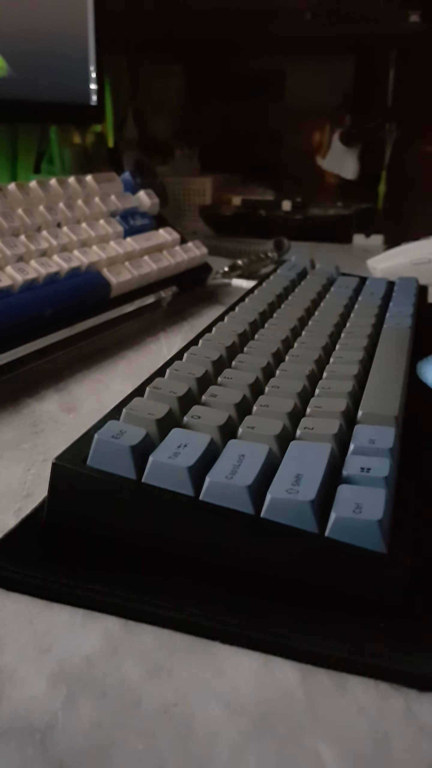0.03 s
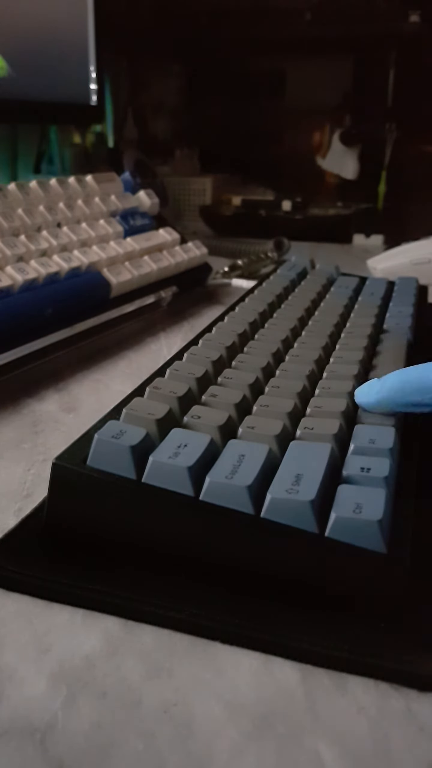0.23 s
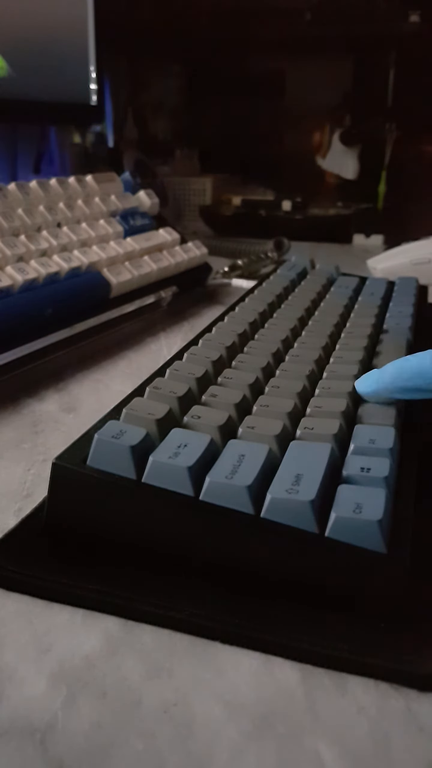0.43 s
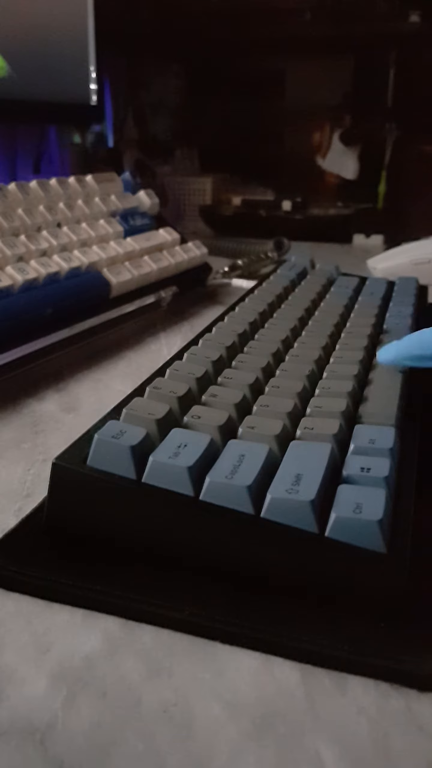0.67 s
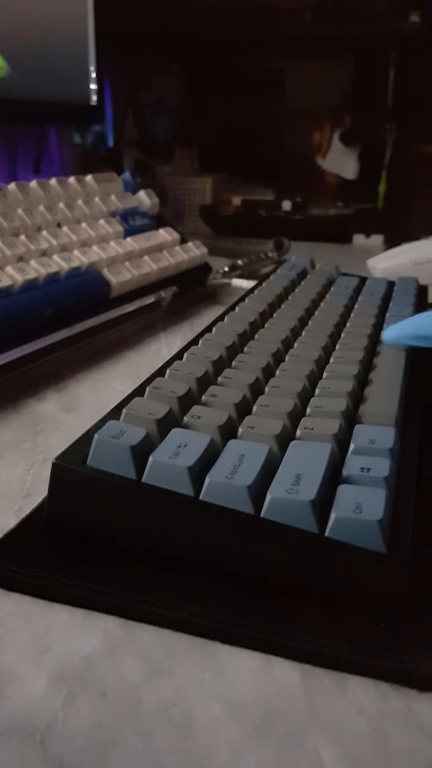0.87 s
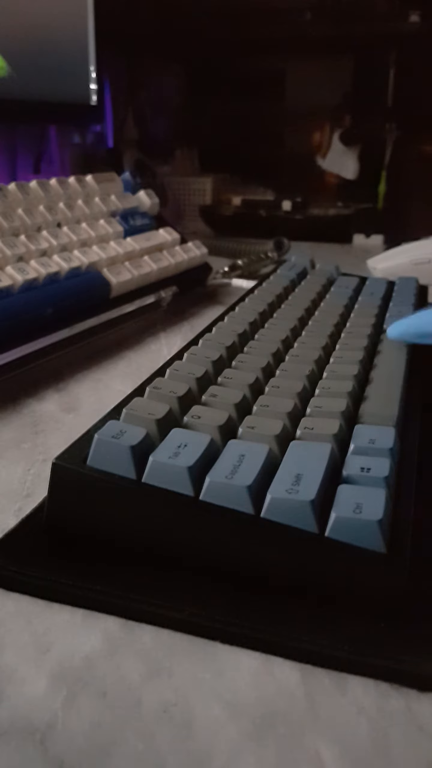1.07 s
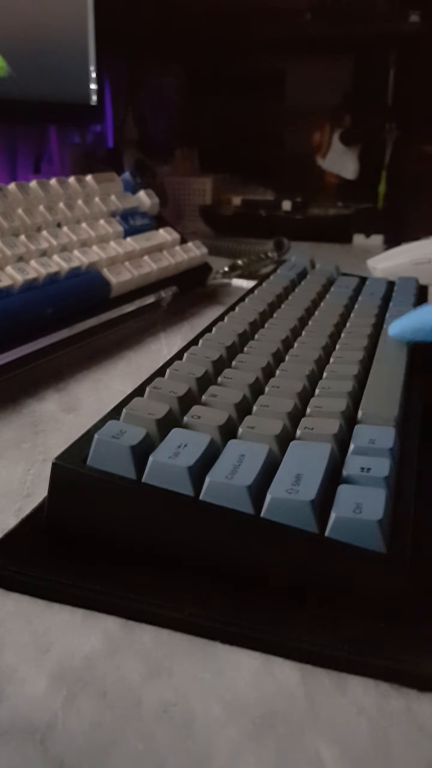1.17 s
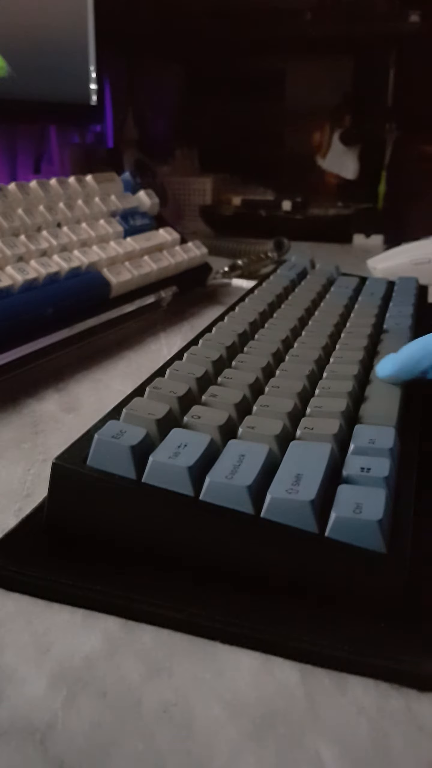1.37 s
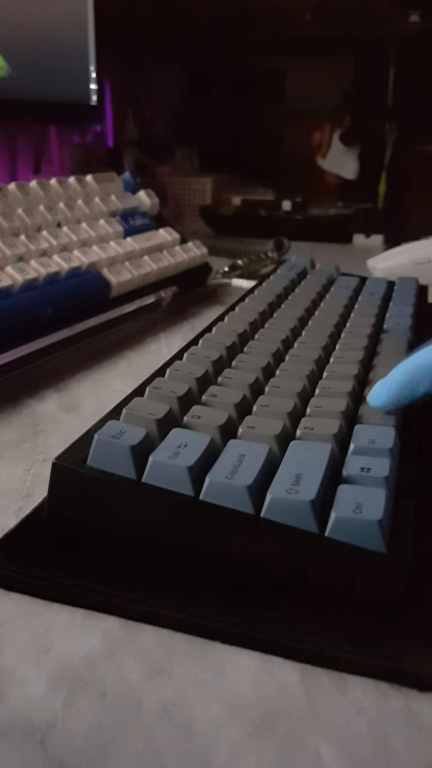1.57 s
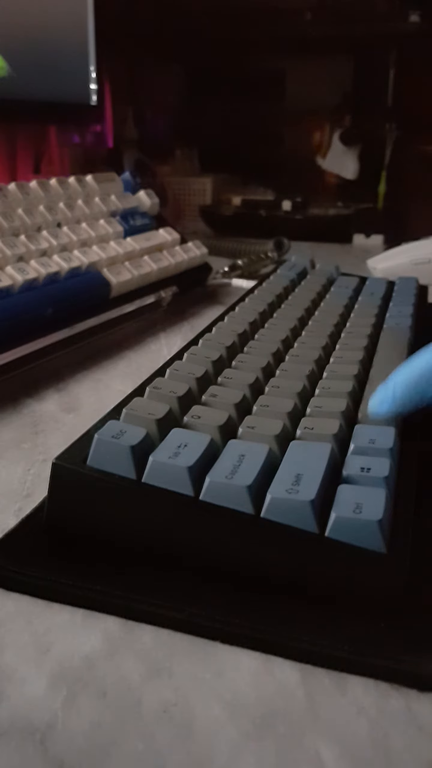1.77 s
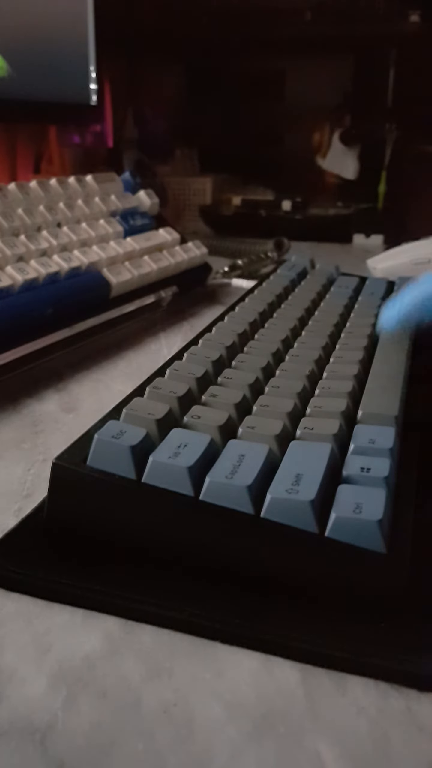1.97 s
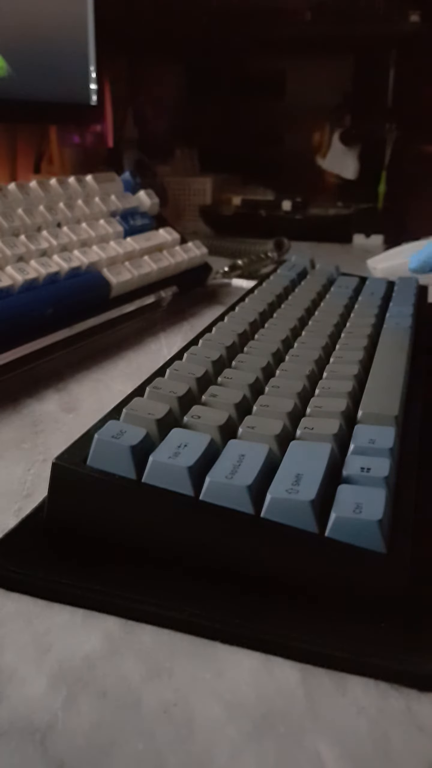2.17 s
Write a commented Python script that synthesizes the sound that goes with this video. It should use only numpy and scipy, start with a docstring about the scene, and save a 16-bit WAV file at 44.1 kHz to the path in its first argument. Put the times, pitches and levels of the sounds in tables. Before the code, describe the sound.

A mechanical keyboard spacebar is tapped eight times at an even pace. Each hard plastic clack is followed by a lighter release click with a faint spring ping, thumping the desk, close to the microphone in a quiet room.

```python
"""The spacebar of a mechanical keyboard, tapped eight times by a finger moving along it, close to a phone.
Each stroke starts with a faint tick and slide. The bar then hits bottom with a hard plastic clack,
and springs back up with a lighter double click and a ping from the spring.
Every blow thumps the desk, and a small, quiet room answers with a short echo."""
import sys
import numpy as np
from scipy import signal
from scipy.fft import rfft, irfft
from scipy.io import wavfile
from scipy.ndimage import uniform_filter1d

SR = 44100
rng = np.random.default_rng(int(sys.argv[2]) if len(sys.argv) > 2 else 0)


def put_to_file(sound):
    """Save the sound as 16-bit audio at rate SR, in the file named by the first command-line argument."""
    columns = np.atleast_2d(sound).T  # one column per channel
    safe = np.clip(columns, -1, 1)
    whole_steps = np.round(safe * 32767)
    wavfile.write(sys.argv[1], SR, whole_steps.astype(np.int16))


N = 97020

# The strokes. Their levels turn each sound up or down from its usual strength.
# The finger meets the bar: start_s, tick_db, slide_db
TOUCHES = [(0.2318, -11, 12), (0.4328, -7, 12), (.4380, -10, 9.5), (0.664, -2, 10), (0.8414, -1, 8.5),
           (1.0417, 0.5, 7.5), (1.2978, -9, 8), (1.311, -2.5, 7.5), (1.549, -7, 7.5), (1.757, -17.5, 4.5)]
# The bar hits bottom: start_s, clack_db, crack_db, snap_db, body_db, boom_db, ring_length_ratio
PRESSES = [(0.2451, 0, 0, 4.5, 2.5, 1.5, 1), (0.4478, 1.5, 0.5, 4.5, 4, -7.5, 0.73),
           (0.6812, -0.5, 1.5, -6, -8, -5.5, .35), (0.864, 4, 4, -9, 2.5, 1, 0.79),
           (1.0692, -9, -19, -12, -9.5, -7, 0.87), (1.3160, 1, -0.5, 2.5, 2.5, -6, 0.84),
           (1.5660, -2.5, -1.5, 2.5, 2, -3, 1.1), (1.7862, -6, -8.5, -5, -4, -3, 0.98)]
# The bar hits its top stop: start_s, click_db, gap_s, second_click_change_db, desk_db, boom_db, spring_db
RELEASES = [(0.3397, -5.5, .0078, -1, -3, -5, -9), (0.543, -2.5, .009, -7.5, 1.5, -6.5, -4),
            (.7470, -5, .0088, -2.5, 1, -1.5, -2.5), (.9540, -5, .0095, 0, -1.5, 1.5, -3),
            (1.1782, -4.5, .009, -1.5, 0, -5.5, -0.5), (1.4171, -1, .0105, -3, 0, -0.5, 2),
            (1.6669, -5, .0095, -4.5, -4, -9.5, -8), (1.9050, -2.5, .0105, -2.5, -1.5, -0.5, -1.5)]

# The tones of each struck part: pitch_hz, level_db, fade_s, left_over_right_db
BAR_DOWN_TONES = [(1114, -38.5, 0.058, 0), (1374, -25.5, 0.056, 7.5), (1487, -32, 0.082, 10),
                  (1914, -34.5, 0.078, 3), (2064, -27.5, 0.062, 10), (2600, -36.5, 0.14, -7.5),
                  (3077, -41, 0.094, 13)]  # hollow bar hitting bottom
HOUSING_TONES = [(4034, -34.5, 0.026, 2), (4597, -24, 0.0088, 7.5), (6330, -38.5, 0.013, 10)]  # switch housing
PLATE_TONES = [(336.4, -29, 0.08, -7), (559.5, -41, .15, -2)]  # plate that holds the switch
KNOCK_TONES = [(127.4, -42, 0.21, -1), (220.9, -43, 0.13, 6), (235.5, -32.5, 0.15, 2.5),
               (356.7, -38, 0.14, -6.5)]  # case and desk
BOOM_TONES = [(72, -29, 0.34, 1)]  # the desk's deepest tone
BAR_UP_TONES = [(1040, -47, 0.15, 10), (1191.4, -38, 0.18, -1.5), (3076, -38, 0.054, 13.5),
                (3984, -33.5, 0.04, 8), (7430, -44, 0.027, 8), (11740, -28.5, 0.0084, -15)]  # bar hitting its top stop
SPRING_TONES = [(2702, -29.5, 0.12, -13), (2730, -34.5, 0.11, 7), (3630, -44, 0.077, -7),
                (4180, -32.5, 0.071, -14)]  # freed spring

# How each noise is balanced from bass to treble: pitch_hz, relative_level_db
HUSH_COLOUR = [(18, -32), (30, -11.5), (130, 0), (230, -10), (473, -12.5), (750, -9.5), (1590, -25),
               (2540, -36), (4780, -43), (5590, -31), (7670, -40.5), (16000, -32.5)]  # quiet room
TICK_COLOUR = [(7500, -17.5), (10300, -1.5), (12500, -25), (17000, -30)]  # finger meeting the bar
SLIDE_COLOUR = [(200, 6.5), (700, -9.5), (1400, -1.5), (5000, -10), (15000, -18)]  # stem (the post under the bar) sliding down
CRACK_COLOUR = [(750, -19.5), (1380, 9), (2100, 0.5), (2800, 1.5), (4000, -8), (5800, -4.5), (11800, 1),
                (13800, -10.5), (15500, -13), (17000, -31)]  # plastic hitting bottom
PRESS_ECHO_COLOUR = [(150, -22.5), (300, -10.5), (470, -15.5), (950, -9.5), (1340, -1.5), (1700, -5),
                     (2150, -5.5), (4600, -15), (6000, -21), (12000, -20), (14000, -27), (17000, -46)]  # room after a press
CLICK_COLOUR = [(700, -30), (2000, -1), (2800, 12), (4000, 1.5), (5500, 6), (12300, 3), (17000, -21.5)]  # stem rubbing upward, bar hitting its top stop
RELEASE_ECHO_COLOUR = [(150, -3), (700, -8), (1200, -0.5), (1900, -11), (2750, 5), (3350, -8), (4050, -2.5),
                       (5000, -11.5), (11700, -11.5), (14000, -22), (17000, -56)]  # room after a release

AGE = np.arange(SR * 3 // 5) / SR  # seconds since a sound began
CLICK_RISE_S, THUMP_RISE_S = 0.0002, 0.0052


def amp(db):
    """Turn decibels into a number to multiply by."""
    return 10 ** (np.asarray(db) / 20)


def pan(left_over_right_db):
    """Left and right gains that place a sound to one side."""
    return amp(np.array([[left_over_right_db], [-left_over_right_db]]) / 2)


def rise(rise_s):
    """A smooth start, about two thirds of the way up after rise_s."""
    return 1 - np.exp(-AGE / rise_s)


def fade(fade_s):
    """A dying away, 60 dB down after fade_s."""
    return np.exp(-np.log(1000) * AGE / fade_s)


def noise(shared=0.34):
    """Stereo noise; a share of its power is the same in both ears."""
    hiss = rng.standard_normal((3, len(AGE)))
    return np.sqrt(shared) * hiss[0] + np.sqrt(1 - shared) * hiss[1:]


def colour(sound, curve, size=4096):
    """Shape bass and treble along a curve, keeping the power of plain noise the same."""
    hz, db = np.array(curve, float).T
    gain = amp(np.interp(np.log(np.fft.rfftfreq(size, 1 / SR) + 1), np.log(hz), db))
    gain /= np.sqrt(np.mean(gain ** 2))
    # Fold the filter forward in time, so nothing sounds before the blow.
    cepstrum = irfft(np.log(gain))
    cepstrum[1:size // 2] *= 2
    cepstrum[size // 2 + 1:] = 0
    response = irfft(np.exp(rfft(cepstrum)))
    return signal.fftconvolve(sound, response[None], axes=1)[:, :sound.shape[1]]


def ring(tones, detune=1, scatter_db=1.5, length=1):
    """A struck part rings with fading tones; their balance shifts a little with each blow."""
    shifts_db = scatter_db * rng.standard_normal(len(tones))
    return sum(pan(side) * amp(db + shift) * fade(fade_s * length) * np.sin(2 * np.pi * hz * detune * AGE)
               for (hz, db, fade_s, side), shift in zip(tones, shifts_db))


def add(out, start_s, sound, right_late_s=0.00017):
    """Mix a sound in; it reaches the right ear right_late_s after the left."""
    for ear, late_s in enumerate((0, right_late_s)):
        first = round(start_s * SR) + round(late_s * SR)
        part = sound[ear, :N - first]
        out[ear, first:first + len(part)] += part


def room_hush():
    """Faint steady room noise, its bass alike in both ears."""
    middle, side = colour(rng.standard_normal((2, N)), HUSH_COLOUR)
    side = signal.sosfilt(signal.butter(1, 1080, "high", fs=SR, output="sos"), side)
    return amp(-56.5) * np.array([middle + side, middle - side])


def finger_touches(out):
    """The finger meets the bar with a thin tick, then the stem slides down."""
    for start_s, tick_db, slide_db in TOUCHES:
        tick = colour(noise() * rise(CLICK_RISE_S) * fade(0.009), TICK_COLOUR)
        slide = colour(noise() * rise(0.003) * fade(0.19), SLIDE_COLOUR)
        add(out, start_s, amp(tick_db - 27.5) * tick + amp(slide_db - 47) * slide)


def bar_presses(out, walls, grit=0.26, far_end_late_s=0.003):
    """Plastic cracks against the bottom: the housing snaps, the plate thuds and the hollow bar clacks."""
    for start_s, clack_db, crack_db, snap_db, body_db, boom_db, length in PRESSES:
        contact = (AGE == 0) + grit * noise() * fade(0.0075)  # one sharp pulse, roughened
        far_end = amp(-21) * noise() * fade(0.013)  # the bar's other end lands a moment later
        for hit_s, push in ((start_s, contact), (start_s + far_end_late_s, far_end)):
            add(out, hit_s, amp(crack_db - 6) * colour(push, CRACK_COLOUR))
        snap = amp(snap_db) * plastic_ring(HOUSING_TONES) * rise(CLICK_RISE_S)
        thud = amp(body_db) * ring(PLATE_TONES) * rise(THUMP_RISE_S) ** 2
        echo = amp(body_db - 28.5) * room_echo(walls, PRESS_ECHO_COLOUR)
        add(out, start_s, snap + thud + echo + desk_thump(body_db, boom_db))
        # The clack rings shorter on some presses, and one is cut off quickly.
        clack = amp(clack_db) * plastic_ring(BAR_DOWN_TONES, length)
        # The whole length of the bar rings, so the lag between the ears is smaller.
        add(out, start_s, clack, right_late_s=0.0001)


def plastic_ring(tones, length=1, low_cut_hz=1008):
    """A plastic part rings; being small, it gives off little low sound."""
    low_cut = signal.butter(4, low_cut_hz, "high", fs=SR, output="sos")
    return signal.sosfilt(low_cut, ring(tones, length=length))


def desk_thump(knock_db, boom_db):
    """Case and desk take up the blow: a woody knock and a slower low boom."""
    knock = ring(KNOCK_TONES) * rise(THUMP_RISE_S) ** 2
    boom = ring(BOOM_TONES, scatter_db=1.0) * rise(0.0088) ** 2
    return amp(knock_db) * knock + amp(boom_db) * boom


def reflections(scatter_db=1.5):
    """A dense train of echoes, uneven in strength at first and smoother later."""
    patches = uniform_filter1d(rng.standard_normal(len(AGE)), size=32)
    uneven_db = scatter_db * patches / patches.std() * fade(0.34)
    echoes = noise(shared=0.33) * amp(uneven_db)
    return echoes / echoes.std()


def room_echo(walls, curve, walls_share=0.54):
    """A quick flurry of echoes off desk and screen, then the room's short tail."""
    echoes = np.sqrt(walls_share) * walls + np.sqrt(1 - walls_share) * reflections()
    flurry, tail = amp(1.5) * fade(0.029), fade(0.17)
    return pan(-1.5) * colour(echoes * rise(0.0032) * (flurry + tail), curve)


def bar_releases(out, walls, lift_s=0.038):
    """The stem rubs upward, the two ends of the bar hit the top stop in turn, and the spring pings."""
    for start_s, click_db, gap_s, second_change_db, desk_db, boom_db, spring_db in RELEASES:
        speed = AGE / lift_s * (AGE < lift_s)  # the stem rises faster and faster
        add(out, start_s - lift_s, amp(-50) * colour(noise() * speed, CLICK_COLOUR))
        for hit_s, level_db in ((start_s, click_db), (start_s + gap_s, click_db + second_change_db)):
            click = amp(-21.5) * colour(noise() * fade(0.015), CLICK_COLOUR)
            hit = rise(CLICK_RISE_S) * (click + plastic_ring(BAR_UP_TONES))
            echo = amp(-32.5) * room_echo(walls, RELEASE_ECHO_COLOUR)
            add(out, hit_s, amp(level_db) * (hit + echo))
        detune = 1 + 0.006 * rng.standard_normal()  # the spring seats a little differently each time
        ping = amp(spring_db) * ring(SPRING_TONES, detune) * rise(0.014)
        add(out, start_s, ping, right_late_s=0)
        add(out, start_s, desk_thump(desk_db, boom_db))


def scene():
    """All eight strokes over the quiet room."""
    out = room_hush()
    walls = reflections()  # the part of the echo that every stroke shares
    finger_touches(out)
    bar_presses(out, walls)
    bar_releases(out, walls)
    return out


def record(dry, low_cut_hz=42.5, high_cut_hz=16400):
    """The phone cuts the deepest bass and the highest treble."""
    thinned = signal.sosfilt(signal.butter(3, low_cut_hz, "high", fs=SR, output="sos"), dry)
    return signal.sosfilt(signal.ellip(8, .2, 80, high_cut_hz, fs=SR, output="sos"), thinned)


dry = scene()
out = record(dry)
put_to_file(out)
```